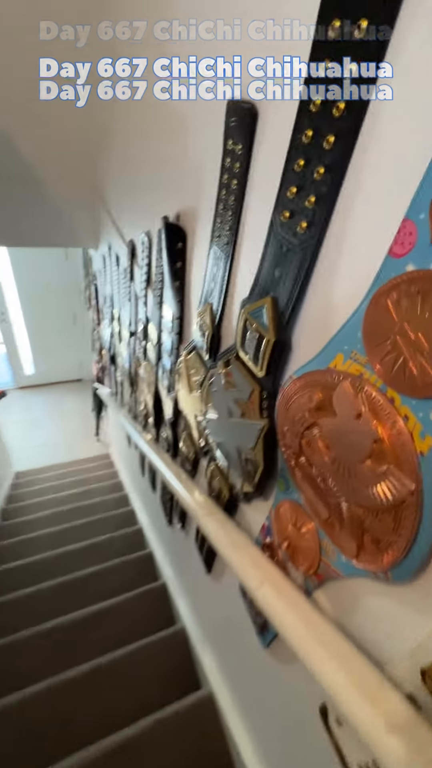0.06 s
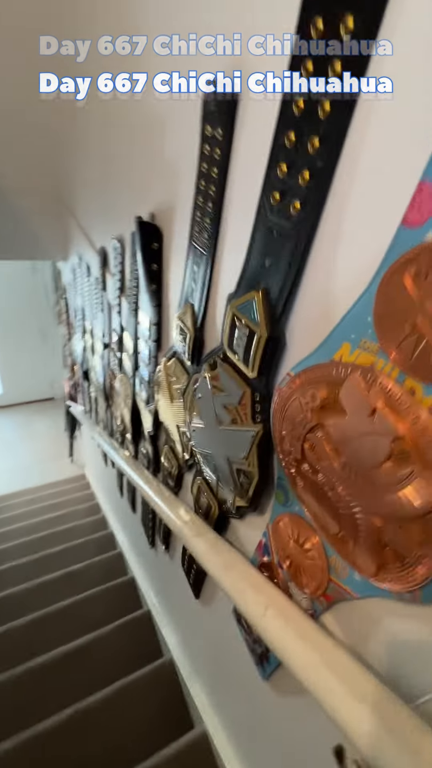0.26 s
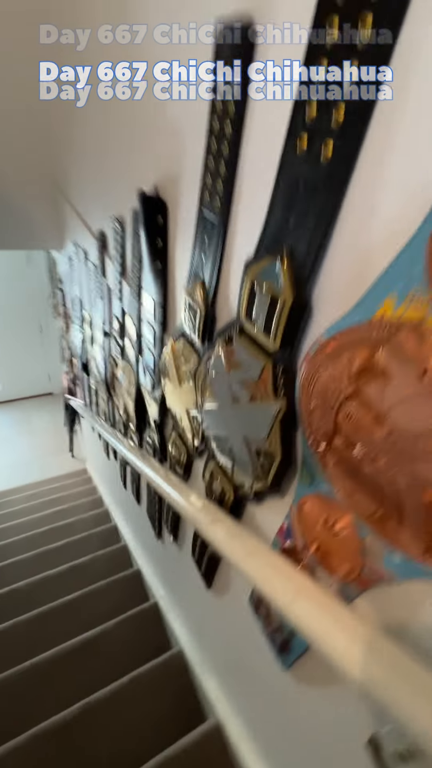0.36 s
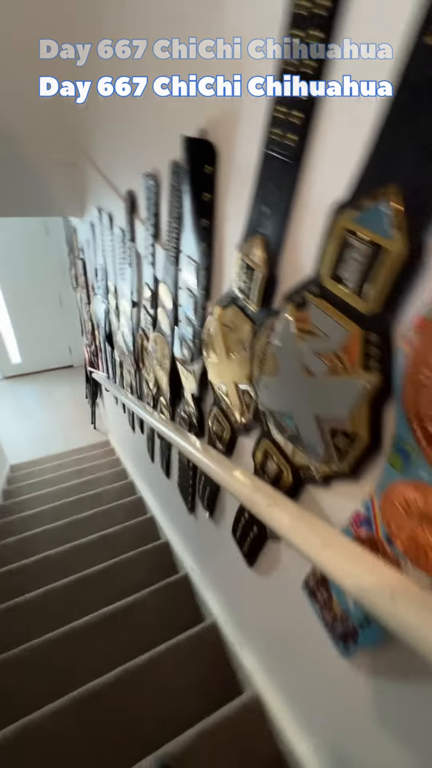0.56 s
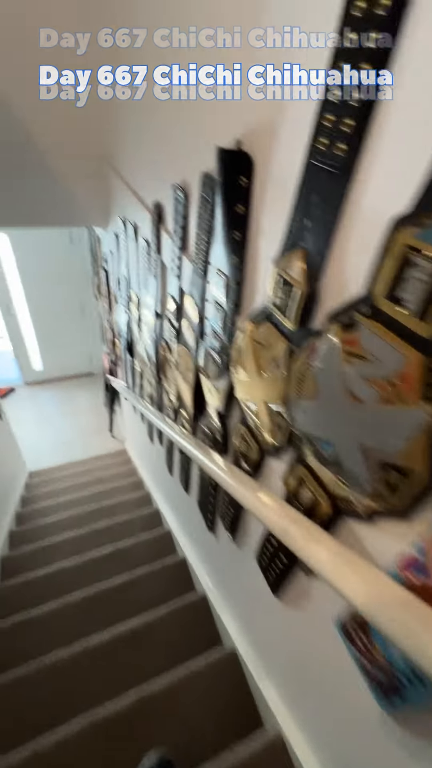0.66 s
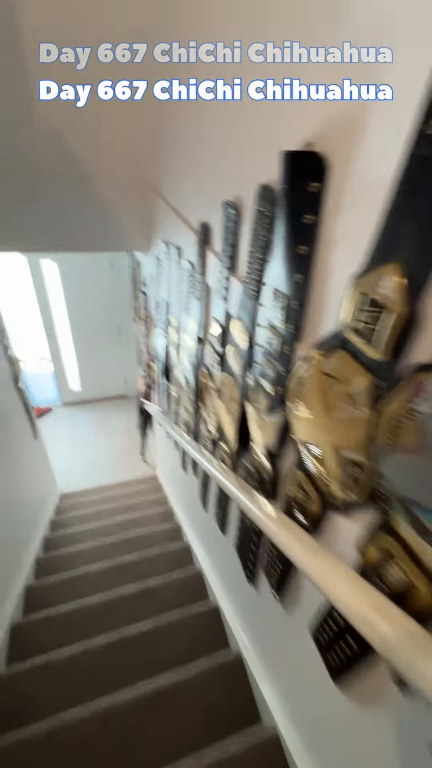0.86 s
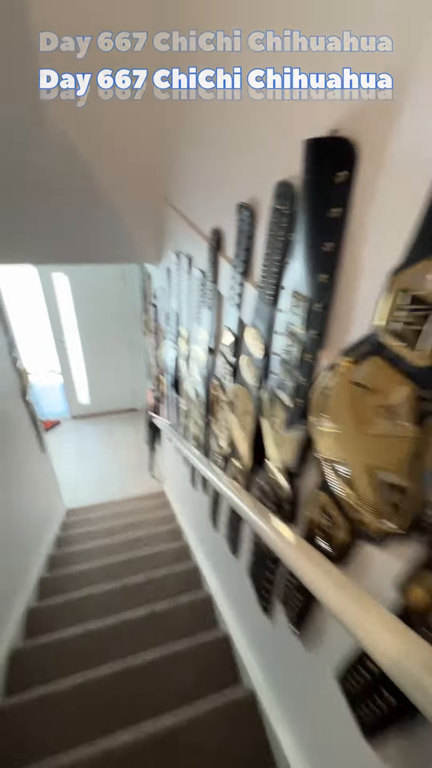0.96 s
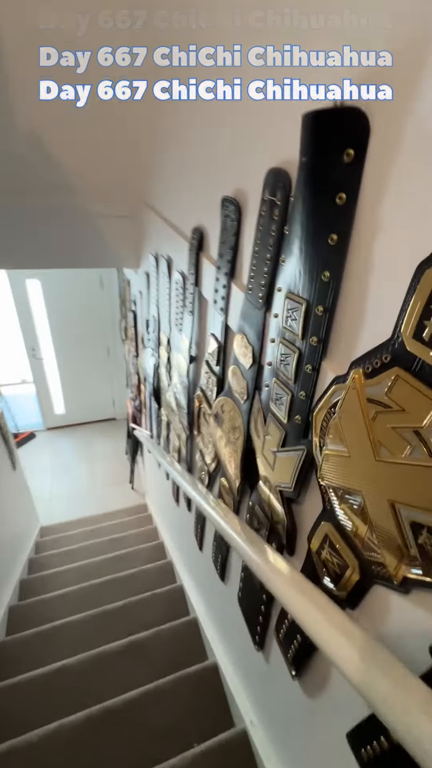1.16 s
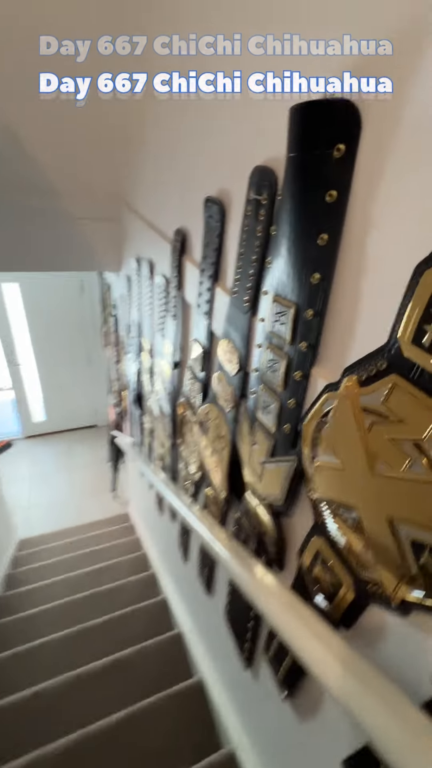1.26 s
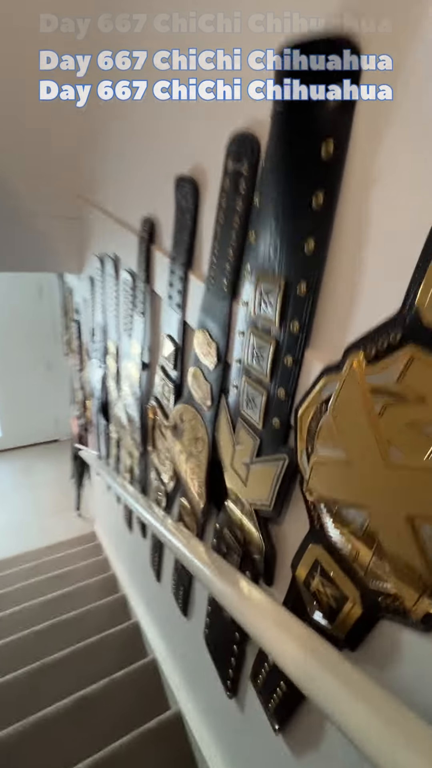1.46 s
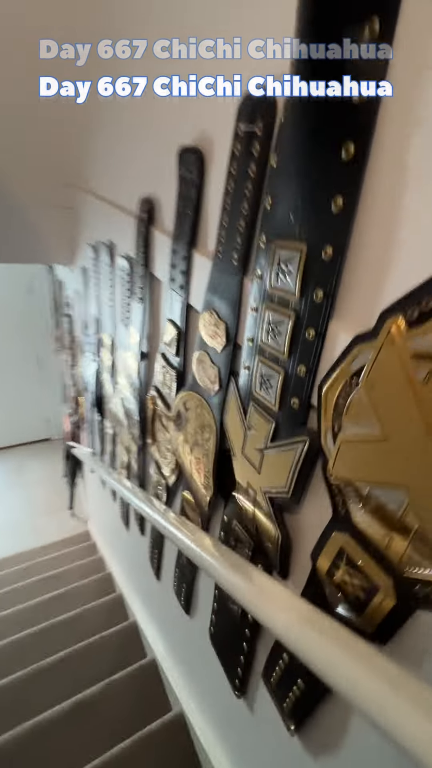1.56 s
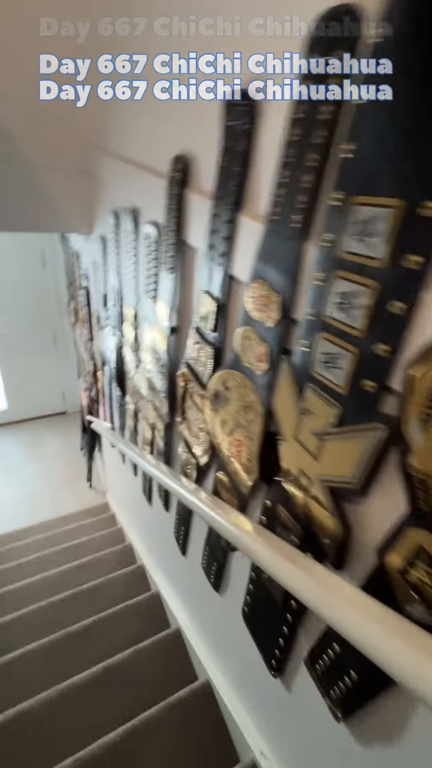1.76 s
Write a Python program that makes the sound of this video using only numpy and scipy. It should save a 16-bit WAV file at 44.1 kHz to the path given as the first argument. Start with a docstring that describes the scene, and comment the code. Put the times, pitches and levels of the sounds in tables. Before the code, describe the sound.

Footsteps go down a carpeted wooden staircase: one heavy, booming thump, lighter steps, then a second heavy footfall and a faint creak. Soles scuff and clothes rustle close to the microphone in a narrow stairwell.

```python
"""Someone walks down a carpeted wooden staircase. A sole brushes the carpet, then at 0.2 s a heavy
footfall booms in the tread and sets the stairs ringing. Lighter steps follow around 0.9 s, the loaded
wood knocks, a second heavy footfall lands at 1.4 s, and a brief creak and a faint step end the walk.
Throughout, soles tap and rub, boards tick under the weight, clothes rustle with the legs,
and the narrow stairwell rings briefly over the quiet air of the house."""
import sys
import numpy as np
from scipy import signal
from scipy.fft import rfft, irfft
from scipy.io import wavfile
from scipy.ndimage import uniform_filter1d

SR = 44100
rng = np.random.default_rng(int(sys.argv[2]) if len(sys.argv) > 2 else 0)


def materialize(psi):
    """Save the field psi as 16-bit PCM at rate SR to the path in sys.argv[1].

    A 1-D psi becomes a single channel; in a 2-D psi each row is a channel.
    """
    bounded = np.clip(np.atleast_2d(psi).T, -1, 1)
    quanta = np.round(bounded * 32767).astype(np.int16)
    wavfile.write(sys.argv[1], SR, quanta)


N = 79380
TIME_S = np.arange(N) / SR
FREQ_HZ = np.fft.rfftfreq(N, 1 / SR)
THUD_ECHO_DB, TAP_ECHO_DB, WOOD_ECHO_DB = -17, -3.5, -5


# weight landing on a tread: start_s, level_db, pitch_hz, rise_s, t60_s
THUDS = [(0.083, -32, 70, 0.018, 0.17), (.2030, -15, 170, 0.00095, 0.028), (.2120, -9, 97, 0.0027, 0.082),
         (0.233, -23, 61.6, 0.005, 0.046), (0.262, -23, 89, 0.0082, 0.11),
         (.293, -31.5, 217.8, 0.0069, 0.096), (0.365, -36.5, 80.8, 0.0035, 0.089),
         (0.457, -38.5, 71.7, 0.0055, 0.13), (0.531, -40.5, 67.6, 0.0062, 0.15),
         (.563, -40, 148, 0.0022, 0.08), (0.774, -40, 81.6, 0.018, 0.38), (0.812, -39.5, 122, 0.0067, 0.22),
         (0.899, -43, 60.5, 0.0086, 0.8), (.948, -29.5, 171, 0.0036, 0.084),
         (1.028, -34, 84.4, 0.0086, 0.14), (1.371, -32, 91.4, 0.0096, 0.18),
         (1.396, -25, 138.3, 0.0037, 0.086), (1.41, -22, 50.5, .008, 0.19), (1.426, -19, 110, 0.003, 0.076),
         (1.447, -25, 53.1, 0.0061, 0.34), (1.546, -35, 78.8, 0.021, 0.22), (1.768, -46, 98, 0.0076, 0.16)]
# staircase modes: pitch_hz, relative_db, t60_s
STAIR_MODES = [(53.1, -1, 0.4), (101, -6, 0.3), (190.6, -13.5, 0.98), (238.4, -1, 0.51), (283.5, 2.5, 0.5),
               (330, 2, 0.18), (429, 1.5, 0.43), (489, 1, 0.12)]

def footfalls(staircase_db=-8):
    """Each landing swings its tread, which sets the whole staircase ringing."""
    treads = np.zeros(N)
    for start_s, level_db, pitch_hz, rise_s, t60_s in THUDS:
        age_s = np.maximum(TIME_S - start_s, 0)
        attack = 1 - np.exp(-age_s / rise_s)
        treads += amp(level_db) * attack * damped_sine(age_s, pitch_hz, t60_s)
    mode_weights = np.transpose(STAIR_MODES)[0] / SR  # higher modes follow a blow faster
    staircase = mode_weights @ modes(STAIR_MODES)
    dry = treads + amp(staircase_db) * ring(treads, staircase)
    return dry + amp(THUD_ECHO_DB) * stairwell(dry)


# sole taps and board ticks: start_s, body_db, knock_db, crack_db, fizz_db, decay_s
TAPS = [(0.076, -56, -43.5, -53.5, -54, 0.0058), (0.117, -38.5, -49, -56, -71, 0.0031),
        (.189, -38, -35.5, -71, -73, 0.002), (0.2016, -26, -34, -44.5, -59, 0.0052),
        (0.448, -44, -41.5, -52, -50.5, 0.0073), (0.508, -47, -41.5, -50, -68, 0.0074),
        (0.732, -45.5, -44.5, -60, -65, 0.008), (0.75, -47.5, -49.5, -55, -76, 0.014),
        (0.889, -46.5, -39.5, -43.5, -53, 0.011), (0.954, -42.5, -45, -56, -62, 0.018),
        (1.199, -46, -52.5, -59.5, -66.5, 0.021), (1.288, -55, -34, -45, -65, 0.0036),
        (1.365, -29, -35.5, -54, -52, 0.003), (1.4, -35, -44, -62, -59.5, 0.016),
        (1.495, -55, -43.5, -45.5, -61, 0.016), (1.507, -37, -49, -68, -53.5, 0.015),
        (1.768, -36.5, -61, -80, -63, 0.0071)]
# body, knock, crack and fizz bands: low_hz, high_hz
TAP_BANDS = [(130, 363), (480, 990), (1350, 3410), (3800, 8000)]

def taps(rise_s=0.0007, cutoff_hz=10500):
    """Soles and boards give short bursts of contact noise, from dull to crisp."""
    dry = np.zeros((2, N))
    for k, edges_hz in enumerate(TAP_BANDS):
        band = signal.butter(2, edges_hz, "band", fs=SR, output="sos")
        force = np.zeros(N)
        for start_s, *levels_db, decay_s in TAPS:
            age_s = np.maximum(TIME_S - start_s, 0)
            force += amp(levels_db[k]) * (1 - np.exp(-age_s / rise_s)) * np.exp(-age_s / decay_s)
        grit = spread(noise())
        dry += signal.sosfilt(band, grit * force) / np.std(signal.sosfilt(band, grit))
    dry = signal.sosfilt(signal.butter(4, cutoff_hz, fs=SR, output="sos"), dry)
    return dry + amp(TAP_ECHO_DB) * stairwell(dry)


# blows on hollow wood: start_s, level_db, contact_s
KNOCKS = [(.204, -41, 0.0011), (.511, -50, 0.0012), (1.025, -51, 0.0016), (1.203, -41.5, .001),
          (1.287, -41.5, 0.00028), (1.77, -48, 0.0016)]
# woodwork modes: pitch_hz, relative_db, t60_s
WOOD_MODES = [(200.8, -0.5, 0.3), (330.3, -7, 0.88), (413, -0.5, 0.34), (493, 1, 0.12), (588, 5.5, 0.05),
              (730, 4, 0.061), (862, 1.5, 0.051)]

def knocks():
    """Hollow woodwork knocks under the load; a longer contact sounds duller."""
    blows = np.zeros(N)
    for start_s, level_db, contact_s in KNOCKS:
        push = np.exp(-np.pi * ((TIME_S - start_s) / contact_s) ** 2)
        blows += amp(level_db) * push / push.sum()
    polarity = (-1) ** np.arange(len(WOOD_MODES))  # neighbouring modes swing opposite ways
    dry = ring(blows, polarity @ modes(WOOD_MODES))
    return dry + amp(WOOD_ECHO_DB) * stairwell(dry)


# sole pressing on carpet: start_s, hold_s, rumble_db, scuff_db
RUBS = [(0.068, 0.13, -50.5, -52.5), (0.22, 0.074, -40.5, -45), (0.299, 0.041, -39, -61),
        (0.449, 0.11, -46, -55.5), (0.742, 0.22, -47.5, -56), (0.864, 0.045, -41, -50.5),
        (0.986, 0.11, -49, -84), (1.294, 0.12, -45, -48.5), (1.354, 0.13, -37.5, -46),
        (1.482, 0.087, -48, -49), (1.64, 0.056, -41.5, -49.5)]
# board rumble and pile scuff spectra: freq_hz, relative_db
RUMBLE_SPECTRUM = [(25, -30), (50, -0.5), (90, -4), (140, -1.5), (200, -0.5), (300, -6.5), (450, -15.5),
                   (800, -28.5), (2000, -70)]
SCUFF_SPECTRUM = [(120, -16), (350, 9.5), (550, 4.5), (850, 1.5), (1400, -12.5), (2300, -12.5), (4000, -32),
                  (8000, -24), (14000, -79)]

def sole_rubs(rise_s=0.015, fall_s=0.048):
    """Soles grind the pile: a scuff above, a rumble in the boards below."""
    rumble_power, scuff_power = np.zeros((2, N))
    for start_s, hold_s, rumble_db, scuff_db in RUBS:
        attack = np.clip((TIME_S - start_s) / rise_s, 0, 1)
        release = np.exp(-np.maximum(TIME_S - start_s - hold_s, 0) / fall_s)
        rumble_power += (amp(rumble_db) * attack * release) ** 2
        scuff_power += (amp(scuff_db) * attack * release) ** 2
    rumble = colour(noise(), RUMBLE_SPECTRUM)
    scuff = colour(friction(slips_per_s=400, slip_share=0.27), SCUFF_SPECTRUM)
    return np.sqrt(rumble_power) * rumble + np.sqrt(scuff_power) * scuff


# slipping boards: start_s, length_s, level_db, pitch_hz, width_hz
CREAKS = [(0.038, 0.004, -52, 740, 300), (0.116, 0.0087, -48, 800, 450), (0.886, 0.01, -45, 1015, 263),
          (1.199, 0.0059, -56.5, 1940, 577), (1.676, 0.021, -44.5, 840, 586)]

def creaks(slips_per_s=400, jitter=0.51):
    """A loaded board breaks loose, then uneven stick and slip drives its resonance."""
    dry = np.zeros(N)
    for start_s, length_s, level_db, pitch_hz, width_hz in CREAKS:
        wander = unit_rms(uniform_filter1d(rng.standard_normal(N), size=120))
        slip_count = np.cumsum(slips_per_s * np.exp(jitter * wander)) / SR
        slips = np.diff(np.ceil(slip_count), prepend=0)
        load = np.maximum(1 - (TIME_S / length_s) ** 2, 0)
        edges_hz = [pitch_hz - width_hz / 2, pitch_hz + width_hz / 2]
        board = signal.butter(2, edges_hz, "band", fs=SR, output="sos")
        creak = signal.sosfilt(board, slips * load) / np.std(signal.sosfilt(board, slips))
        onset = round(start_s * SR)
        dry[onset:] += amp(level_db) * creak[:N - onset]
    return dry + amp(WOOD_ECHO_DB) * stairwell(dry)


# rustle as the legs swing: time_s, level_db
LEG_SWING = [(0, -62), (.19, -62), (.215, -56), (.28, -56.5), (.33, -52.5), (.42, -59.5), (.53, -56),
             (.62, -65.5), (.735, -65), (.76, -55.5), (.87, -58), (.92, -56), (.98, -57), (1.05, -63.5),
             (1.35, -66), (1.40, -56.5), (1.47, -58), (1.53, -55), (1.61, -60.5), (1.72, -61), (1.8, -68.5)]
# cloth folds flicking: start_s, level_db
FLICKS = [(0.077, -59), (0.138, -56), (0.451, -58), (0.506, -55.5), (0.812, -54), (0.888, -48.5),
          (1.398, -56.5)]
# rustle and flick spectra: freq_hz, relative_db
RUSTLE_SPECTRUM = [(200, -47), (900, 10.5), (2300, 7), (3800, 4.5), (6000, 5), (8200, 2.5), (9700, -2),
                   (11200, -7), (12300, -14.5), (16000, -9.5)]
FLICK_SPECTRUM = [(2000, -2), (5000, 3), (8200, -4), (11200, -3), (12500, -16), (16000, -16)]

def clothes(flick_decay_s=0.0069):
    """Fabric brushes with each swing of a leg, and now and then a fold flicks."""
    swing = amp(np.interp(TIME_S, *np.transpose(LEG_SWING)))
    rustle = swing * colour(friction(slips_per_s=1200, slip_share=0.41), RUSTLE_SPECTRUM)
    snaps = sum(amp(level_db) * (TIME_S > start_s) * np.exp(-abs(TIME_S - start_s) / flick_decay_s)
                for start_s, level_db in FLICKS)
    flicks = snaps * colour(noise(), FLICK_SPECTRUM)
    return rustle + flicks + amp(TAP_ECHO_DB) * stairwell(flicks)


# stairwell decay: freq_hz, t60_s
STAIRWELL_DECAY = [(60, 0.42), (200, 0.56), (600, 0.29), (2000, 0.18), (6000, 0.41), (14000, 0.054)]

def stairwell(sound, rise_s=0.004):
    """The stairwell echoes with a dense tail, each band dying at its own speed."""
    freq_hz, age_s, bands = signal.stft(spread(noise()), SR, nperseg=512)
    decay = amp(-60 * age_s / curve_at(STAIRWELL_DECAY, freq_hz)[:, None])
    tail = signal.istft(bands * decay, SR, nperseg=512)[1][:, :SR]
    tail *= np.minimum(TIME_S[:SR] / rise_s, 1)
    return ring(sound, tail / np.linalg.norm(tail[0]))


# house background spectrum: freq_hz, relative_db
AIR_SPECTRUM = [(20, 8.5), (55, 3), (100, 3), (250, -13.5), (700, -8), (1400, -23), (2300, -19.5),
                (4500, -34), (8200, -26), (10000, -61), (12500, -69), (16000, -56)]

def house_air(level_db=-55):
    """The house gives a quiet, steady, mostly low noise."""
    return amp(level_db) * colour(noise(), AIR_SPECTRUM)


def friction(slips_per_s, slip_share, spread_db=3):
    """Many tiny slips of fibres, a few large, over a smooth hiss."""
    slipping = rng.random((2, N)) < slips_per_s / SR
    sizes = amp(spread_db * np.minimum(rng.exponential(1, (2, N)), np.pi))
    slips = slipping * sizes * np.sign(noise())
    return np.sqrt(slip_share) * unit_rms(slips) + np.sqrt(1 - slip_share) * noise()


def damped_sine(age_s, pitch_hz, t60_s):
    """One resonance, falling 60 dB in t60_s."""
    return np.exp(-np.log(1000) * age_s / t60_s) * np.sin(2 * np.pi * pitch_hz * age_s)


def modes(table):
    """The decaying sines of a struck body, one per row."""
    return np.array([amp(db) * damped_sine(TIME_S, hz, t60_s) for hz, db, t60_s in table])


# left-right likeness: freq_hz, correlation
COHERENCE = [(30, 0.82), (200, 1), (330, 0.92), (550, 0.28), (900, 0), (1800, 0.53), (3000, 0.28),
             (5500, 0), (8200, 0.27), (13000, 0.7)]

def spread(pair):
    """Makes two unrelated signals alike, most in the bass, as two close microphones hear them."""
    correlation = curve_at(COHERENCE, FREQ_HZ)
    mid, side = rfft(pair) * np.sqrt([(1 + correlation) / 2, (1 - correlation) / 2])
    return irfft(np.array([mid + side, mid - side]), N)


def colour(pair, spectrum):
    """Gives a signal pair a spectrum and stereo width, at rms 1."""
    return unit_rms(irfft(rfft(spread(pair)) * amp(curve_at(spectrum, FREQ_HZ)), N))


def curve_at(points, freq_hz):
    """Interpolates on a log-frequency axis."""
    points_hz, values = np.transpose(points)
    return np.interp(np.log(freq_hz + 1), np.log(points_hz), values)


def ring(sound, response):
    """Convolves along time."""
    return signal.fftconvolve(np.atleast_2d(sound), np.atleast_2d(response), axes=1)[:, :N]


def noise():
    """Two channels of white noise."""
    return rng.standard_normal((2, N))


def amp(db):
    """Decibels to gain."""
    return 10 ** (np.asarray(db) / 20)


def unit_rms(sound):
    """Scales to rms 1."""
    return sound / np.sqrt(np.mean(sound ** 2) + 1e-20)


def scene():
    """Steps and clothes over the quiet air of the house."""
    return footfalls() + taps() + creaks() + knocks() + sole_rubs() + clothes() + house_air()


# stereo balance: freq_hz, left_minus_right_db
BALANCE = [(150, 0.06), (700, 2), (1300, -0.5), (2600, 1.5), (6000, 0.5), (11000, -0.2)]

def record(dry, left_lag_s=2.1e-5, low_cut_hz=39, high_cut_hz=15750):
    """Two band-limited microphones; the left is slightly louder and a little farther from the body."""
    sides = [0.5, -0.5]
    gain = amp(np.outer(sides, curve_at(BALANCE, FREQ_HZ)))
    delay = np.exp(-2j * np.pi * np.outer(sides, FREQ_HZ) * left_lag_s)
    pair = irfft(rfft(dry) * gain * delay, N)
    highpass = signal.butter(6, low_cut_hz, "high", fs=SR, output="sos")
    lowpass = signal.firwin(511, high_cut_hz, window=("kaiser", 9), fs=SR)
    return signal.oaconvolve(signal.sosfilt(highpass, pair), lowpass[None], "same")


dry = scene()
out = record(dry)
materialize(out)
```